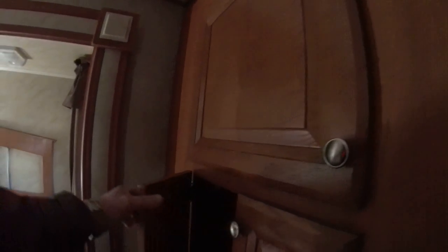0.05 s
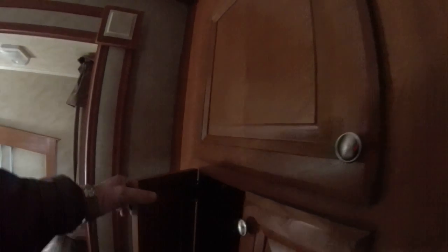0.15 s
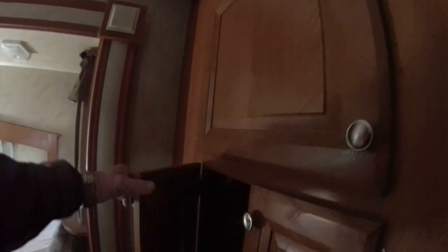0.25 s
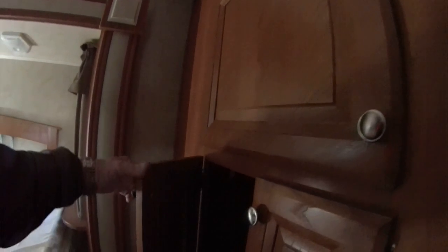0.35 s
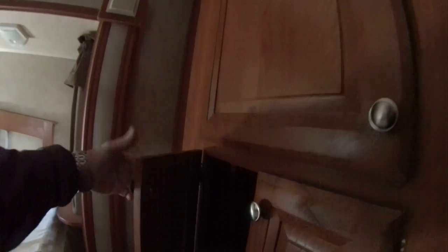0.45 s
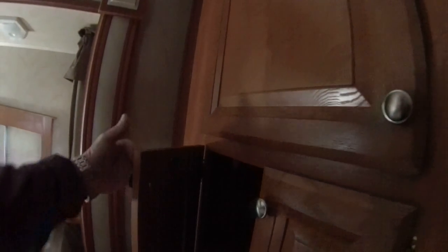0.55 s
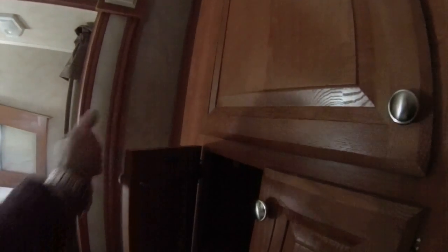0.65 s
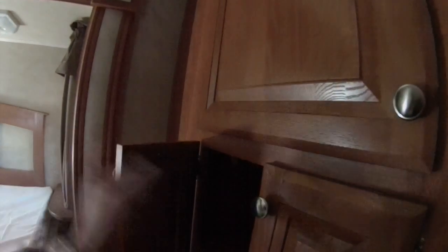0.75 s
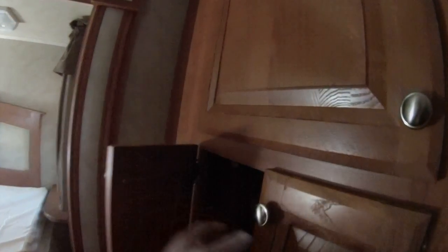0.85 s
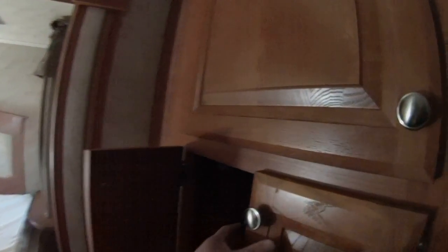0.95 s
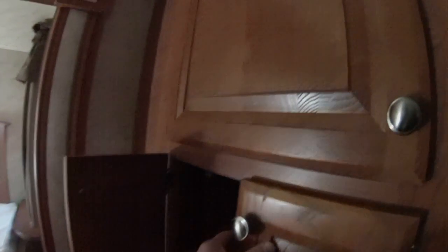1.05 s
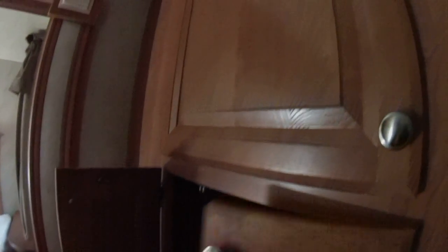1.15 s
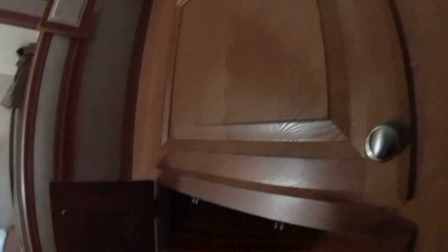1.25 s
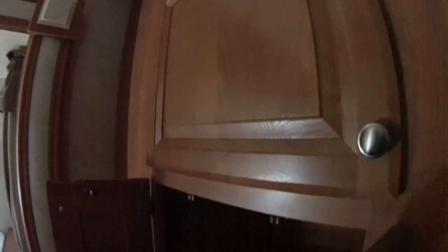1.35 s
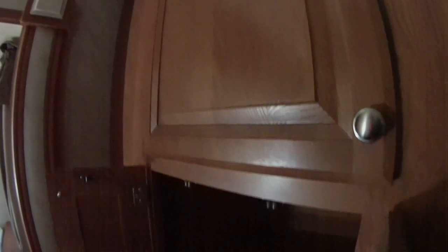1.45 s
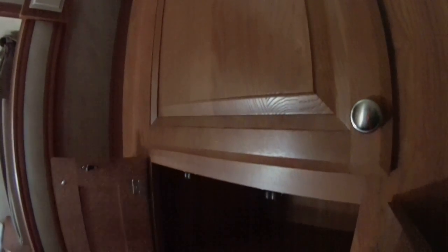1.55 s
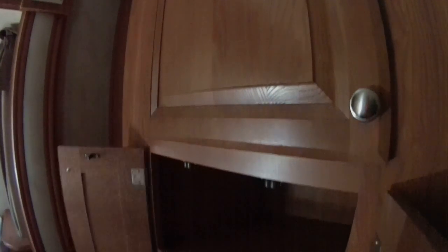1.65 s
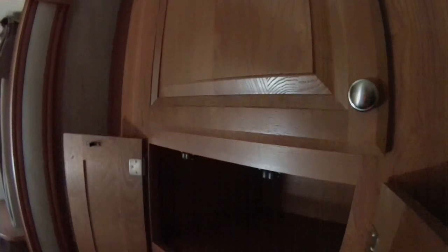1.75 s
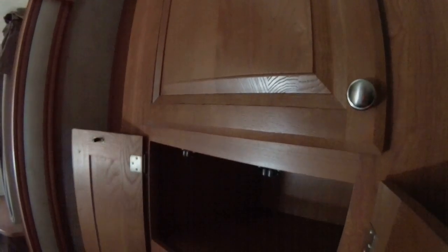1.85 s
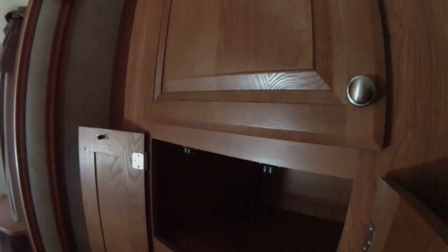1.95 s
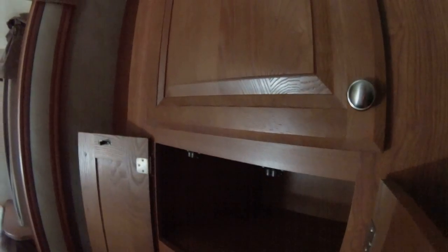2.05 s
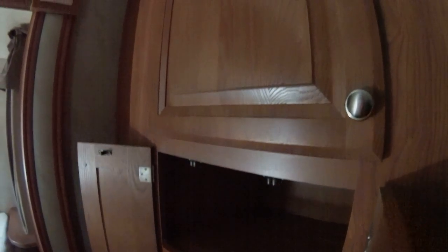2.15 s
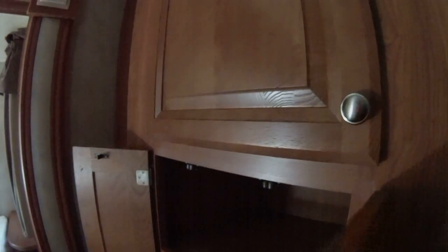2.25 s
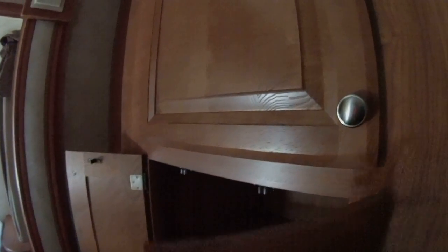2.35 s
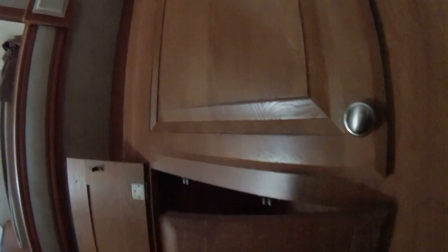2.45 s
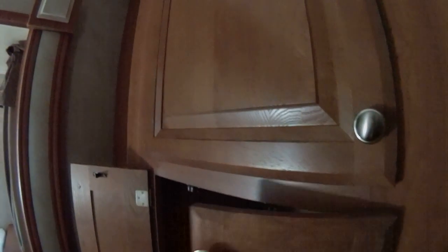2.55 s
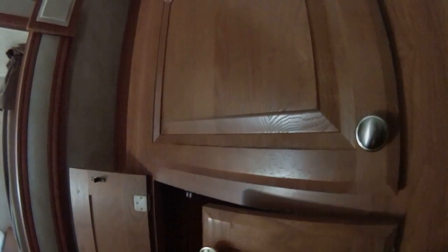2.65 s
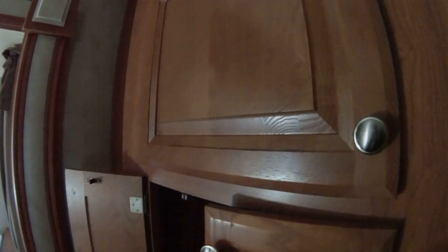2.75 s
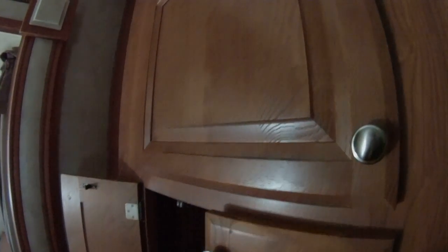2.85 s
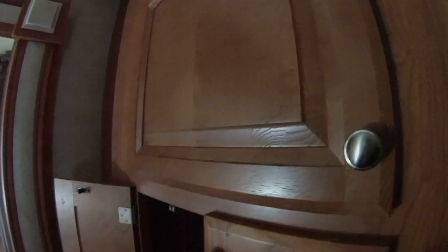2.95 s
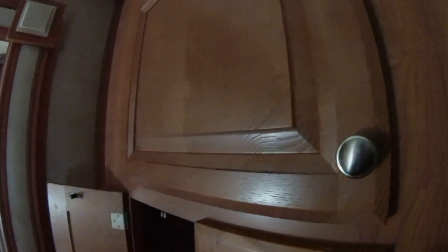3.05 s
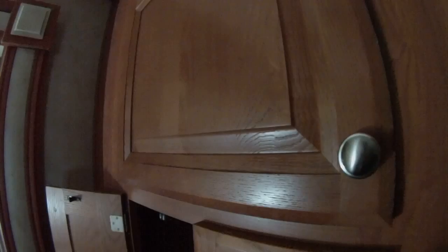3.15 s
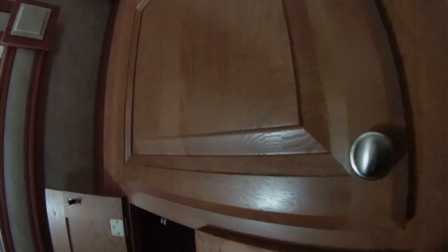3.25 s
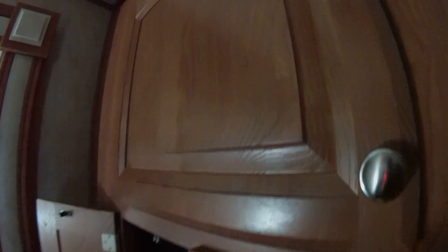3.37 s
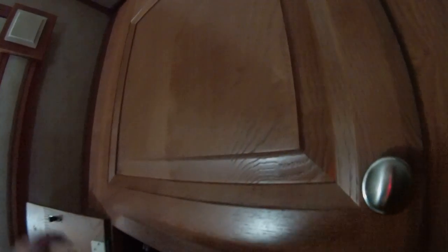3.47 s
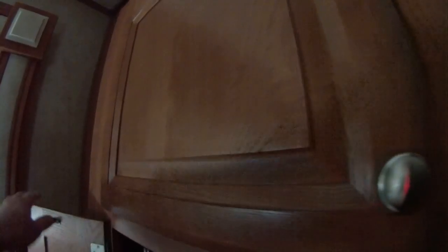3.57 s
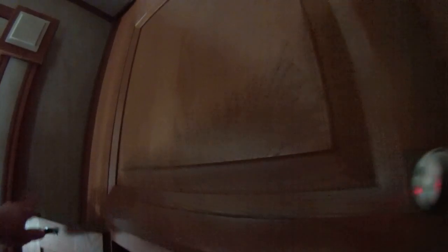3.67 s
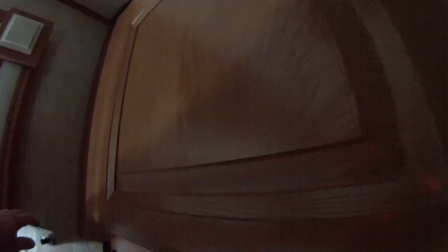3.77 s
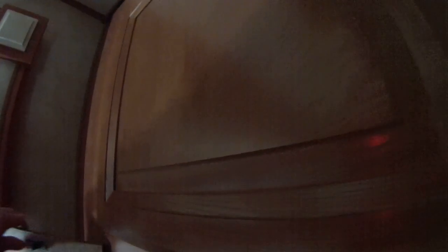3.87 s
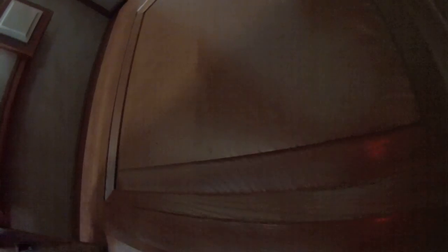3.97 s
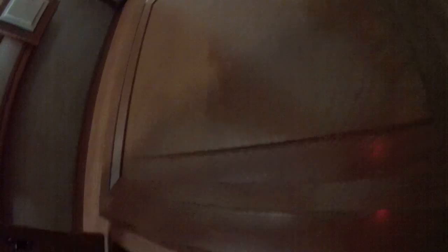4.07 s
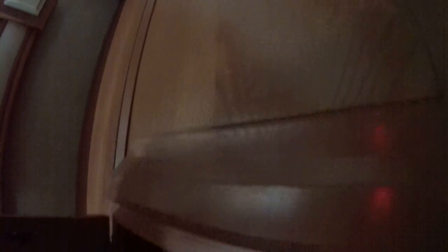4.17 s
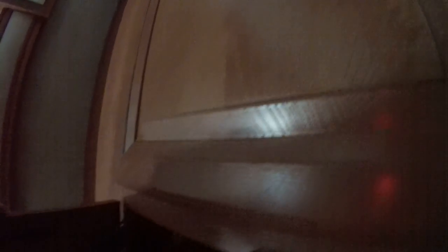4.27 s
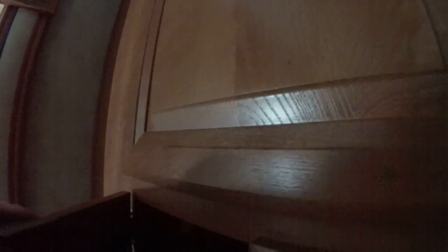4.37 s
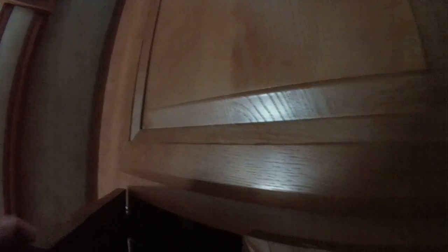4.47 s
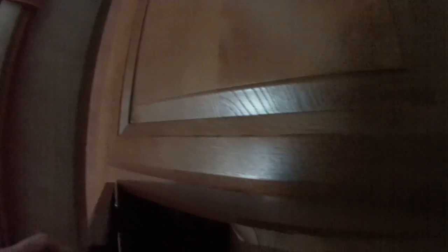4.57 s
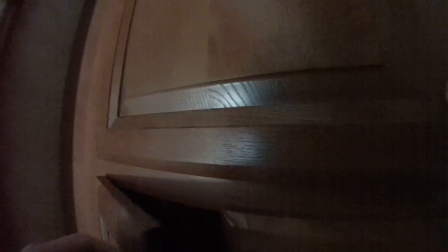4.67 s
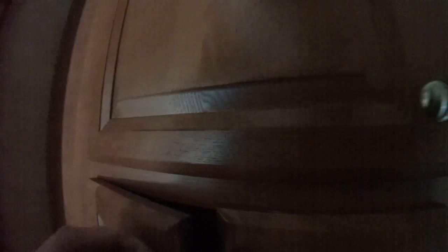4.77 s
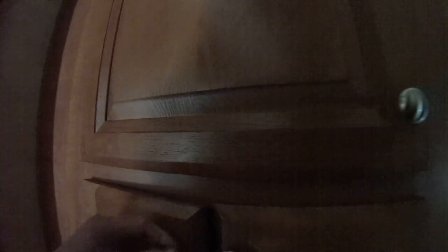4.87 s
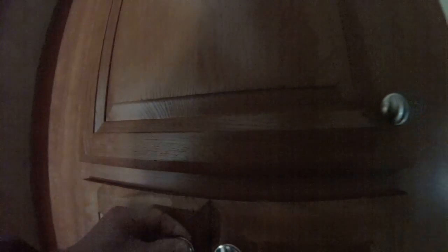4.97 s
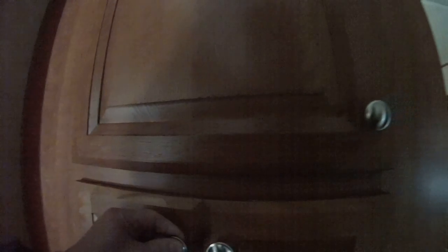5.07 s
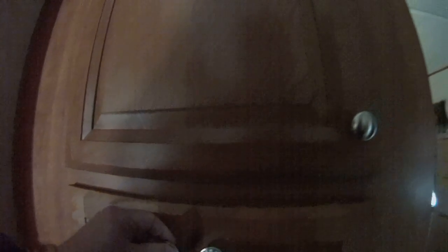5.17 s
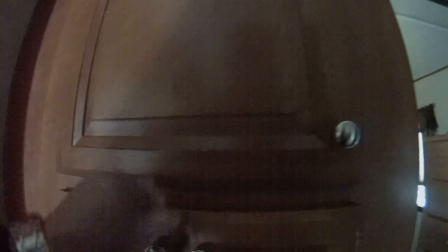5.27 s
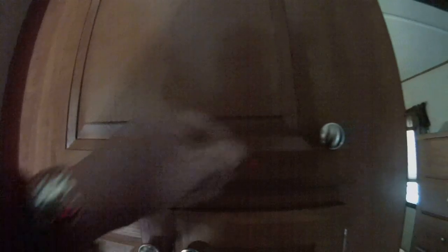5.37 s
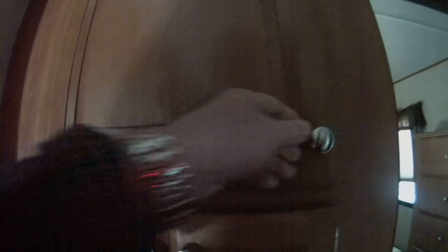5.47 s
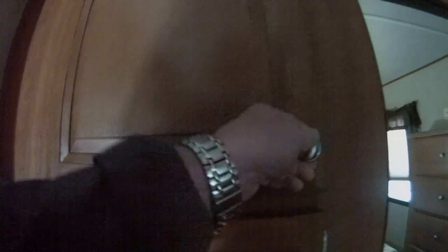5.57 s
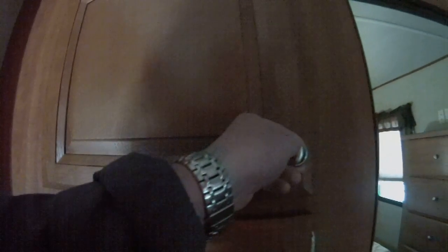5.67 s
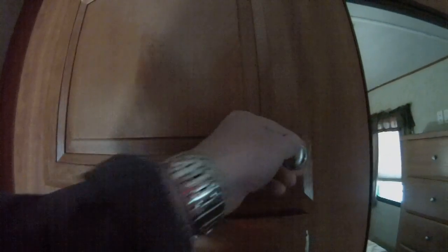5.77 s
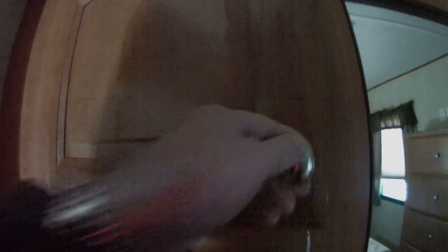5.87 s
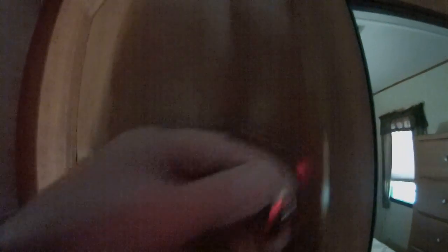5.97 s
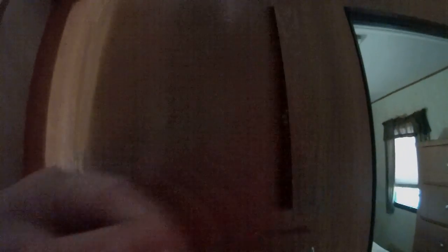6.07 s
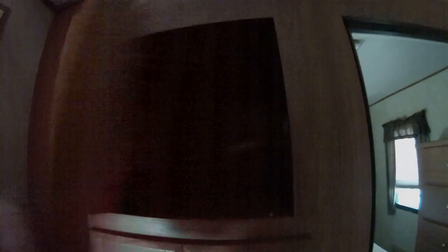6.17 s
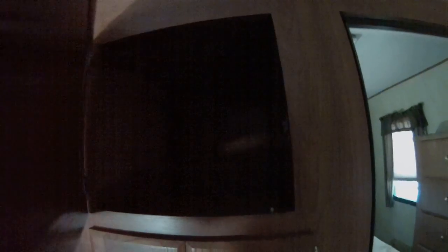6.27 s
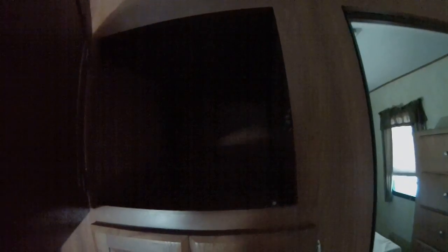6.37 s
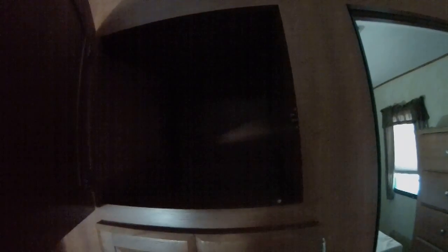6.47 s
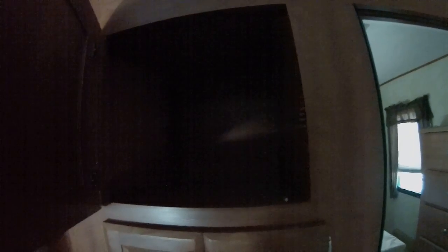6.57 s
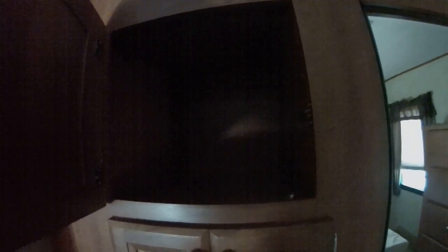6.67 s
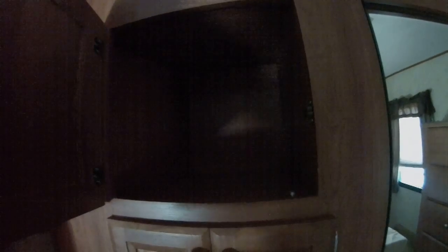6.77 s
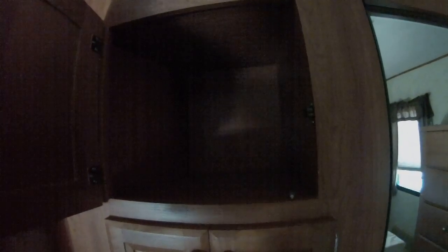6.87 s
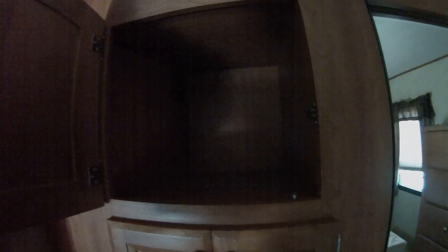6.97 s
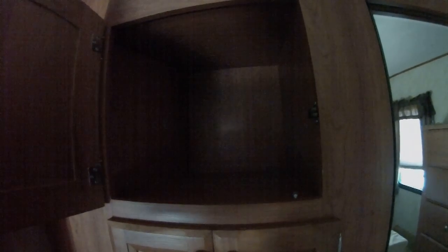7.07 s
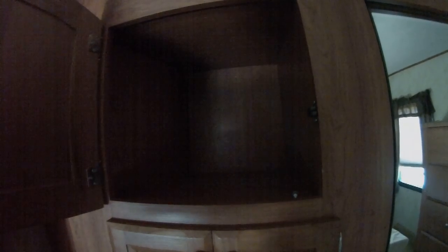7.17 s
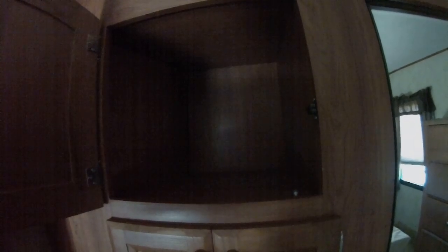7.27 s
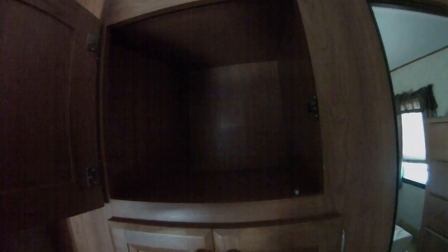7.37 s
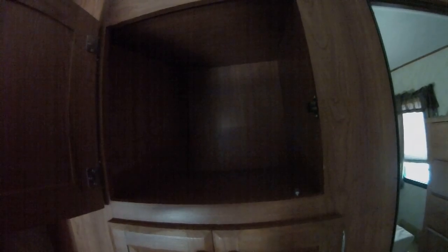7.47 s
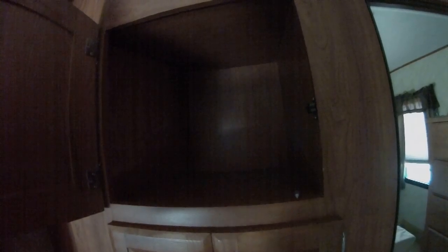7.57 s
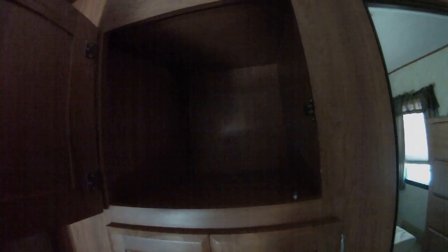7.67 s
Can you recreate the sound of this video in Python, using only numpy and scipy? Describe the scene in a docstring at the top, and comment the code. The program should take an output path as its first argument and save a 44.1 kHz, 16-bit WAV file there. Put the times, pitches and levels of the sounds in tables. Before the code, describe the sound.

Close hollow wood knocks: cabinet doors click open, bang shut twice, with dry rubbing, metal ticks, faint creaks and sleeve rustle between.

```python
"""Cabinet doors opened and shut by hand

Wooden doors are pulled open and pushed shut close to a hand-held camera in a small room.
Each blow is a noise crack, sine panel modes and a woody noise tail; metal ticks mark the sprung catches.
Grainy noise makes the rubs and hinge creaks, and short sine pairs are fingers tapping the camera.
A sleeve of coloured grains rustles over low rumble and faint air, both coloured noise.
The camera turns its gain down on loud bursts and lets it creep back."""
import sys
import numpy as np
from scipy import signal
from scipy.fft import rfft, irfft, next_fast_len
from scipy.io import wavfile
from scipy.ndimage import uniform_filter1d

SR = 44100
rng = np.random.default_rng(int(sys.argv[2]) if len(sys.argv) > 2 else 0)


def store_wav(level_fs):
    """Save 16-bit WAV to argv[1]."""
    pcm = np.round(np.clip(np.atleast_2d(level_fs), -1, 1) * 32767)
    wavfile.write(sys.argv[1], SR, pcm.T.astype(np.int16))


N = 340893
TIME = np.arange(N) / SR
BANDS_HZ = 31.25 * 2 ** (np.arange(28) / 3)  # third-octave centres
BOX_LAG_S = 0.006  # the cabinet answers this long after the door moves

# resonances of the cabinet and its panels: pitch_hz, level_db (blows only, before the drive)
PANEL_MODES = [(63, -0.5), (72, -4), (79, -14), (105, 2), (148, 0.5), (163, -12), (189, -10), (260, -11),
               (294, -1.5), (367, 4), (429, 3.5), (462, -9), (580, 2.5), (715, -7.5), (804, -9),
               (953, -4.5), (1113, 2), (1286, -9), (1420, -3), (1564, -6.5), (1860, -5), (2040, -11.5),
               (2310, -4.5), (2510, -4.5), (3350, -6.5), (3980, -6)]


def doors():
    """Doors shut and open, with light knocks and soft bumps in between."""
    # doors pushed shut: start_s, level_db, contact_cutoff_hz, struck_tone_hz, catch_ride_s,
    # edge_db, box_db, rebound_db (these three relative to level_db), rattle_delay_s
    slams = [(3.027, -24.5, 5200, 1287, .018, -5, 1, -12, .062),
             (5.0308, -25.5, 2700, 1000, 0.025, -10.5, 0, 2.5, .043)]
    # doors pulled open: start_s, level_db, thud_db, catch_ring_hz, snap_delay_s, snap_db, snap_hz,
    # rattle_delay_s
    pulls = [(1.172, -46.5, -37, 2032, .0235, -26, 7560, .0747),
             (5.8194, -43, -58, 2504, .0115, -29.5, 10630, .1094)]
    # hard light knocks of a door on its catch or stop: start_s, level_db, contact_cutoff_hz, struck_tone_hz
    knocks = [(1.103, -53.5, 6800, 2000), (2.861, -50.5, 4535, 3280), (3.000, -54, 4970, 3120),
              (3.751, -58.5, 3600, 1520), (4.926, -45, 3630, 3345), (4.935, -43.5, 3600, 600),
              (5.802, -46.5, 8000, 1280)]
    # soft bumps of a hand or a swinging door: start_s, level_db, contact_cutoff_hz, struck_tone_hz
    bumps = [(0.035, -56, 365, 130), (0.394, -56.5, 199, 140), (1.076, -50, 157, 100),
             (1.205, -46, 390, 440), (1.946, -60.5, 500, 110), (1.987, -52.5, 330, 120),
             (2.663, -53.5, 222, 224), (2.863, -38, 223, 108), (2.878, -54.5, 860, 790),
             (3.758, -45.5, 404, 102), (5.215, -48, 129, 84), (5.742, -63, 700, 430),
             (5.805, -48, 885, 580)]

    shut = sum(slam(*row) for row in slams)
    opened = sum(pull(*row) for row in pulls)
    knocking = sum(stroke(*row, tone_db=6.5, bass_db=2.5) for row in knocks)
    bumping = sum(stroke(*row, tone_db=15.5, bass_db=-1.5) for row in bumps)
    return shut + opened + knocking + bumping


def slam(start_s, level_db, contact_hz, tone_hz, ride_s, edge_db, box_db, rebound_db, rattle_s,
         ride_db=-16.5, ride_softness=0.54, latch_db=-20):
    """The door rides over the catch, lands edge first, then flat; box booms, door rebounds, catch rattles."""
    edge_s = start_s - 0.0064
    ride = stroke(start_s - ride_s, level_db + ride_db, contact_hz * ride_softness,
                  tone_hz=990, tone_db=2.5, bass_db=0)
    edge = stroke(edge_s, level_db + edge_db, contact_hz=3640, tone_hz=1600, tone_db=10.5, bass_db=1)
    flat = stroke(start_s, level_db, contact_hz, tone_hz, tone_db=7, bass_db=0.5)
    box = stroke(start_s + BOX_LAG_S, level_db + box_db, contact_hz=474, tone_hz=170, tone_db=7.5, bass_db=-1)
    rebound = stroke(start_s + 0.012, level_db + rebound_db, contact_hz=900,
                     tone_hz=370, tone_db=5.5, bass_db=-2)
    latch = tick(edge_s, level_db=-36.5, pitch_hz=10600) + tick(start_s, latch_db + edge_db, pitch_hz=5500)
    rattle = tick(start_s + rattle_s, level_db=-36, pitch_hz=6130, cycles=330, partials_db=4.5)
    return ride + edge + flat + box + rebound + latch + rattle


def pull(start_s, level_db, thud_db, ring_hz, snap_s, snap_db, snap_hz, rattle_s):
    """The door jumps out of the ringing catch and thuds; the spring snaps back and rattles once."""
    release = stroke(start_s, level_db, contact_hz=7000, tone_hz=1870, tone_db=10, bass_db=-1)
    ring = tick(start_s, level_db=-28.5, pitch_hz=ring_hz, cycles=260, partials_db=-1)
    thud = stroke(start_s + BOX_LAG_S, thud_db, contact_hz=450, tone_hz=400, tone_db=9.5, bass_db=6.5)
    snap = tick(start_s + snap_s, snap_db, snap_hz)
    rattle = tick(start_s + rattle_s, level_db=-42, pitch_hz=8200)
    return release + ring + thud + snap + rattle


def stroke(start_s, level_db, contact_hz, tone_hz, tone_db, bass_db):
    """One blow on the wood, placed in time."""
    out = np.zeros(N)
    add(out, start_s, undb(level_db) * blow(contact_hz, tone_hz, tone_db, bass_db))
    return out


def blow(contact_hz, tone_hz, tone_db, bass_db, tone_octaves=0.32, modes_db=0.9, crack_db=2,
         crack_t60=0.0042, rise_cycles=1.0, early_share=0.33, late_db=-3.5):
    """A contact excites a short crack, the panel modes and a dense woody tail."""
    # dense ring of wood and room together: pitch_hz, band_level_db, late_t60_s
    wood = [(35, -12.5, 0.43), (70, -8.5, 0.93), (144, -4.5, 0.39), (263.6, -1, 0.33), (463, -0.5, 0.26),
            (1003, 1.5, 0.18), (2640, -1.5, .17), (5000, 1.5, .17), (8000, -3, 0.18), (15000, -3.5, 0.13)]
    wood_hz, wood_db, wood_t60 = np.transpose(wood)
    t = TIME[:SR // 2]

    def drive(hz):
        """A soft contact cannot push fast; the struck spot favours one region; bass moves the whole box."""
        tone = tone_db * hump(hz, tone_hz, tone_octaves)
        bass = bass_db / (1 + (hz / 190) ** 2)
        return undb(tone + bass) / np.sqrt(1 + (hz / contact_hz) ** 4)

    def decay(hz):
        """The frame soon stops the door; box and room ring on more quietly."""
        t60 = np.interp(np.log(hz), np.log(wood_hz), wood_t60)
        return fade(t, early_share * t60) + undb(late_db) * fade(t, t60)

    hz = BANDS_HZ[:, None]
    bands = shape(rng.standard_normal(len(t)), lambda f: abs(np.log2(f / hz)) < 1 / 6)
    band_gain = drive(hz) * undb(np.interp(np.log(hz), np.log(wood_hz), wood_db))
    # a short crack straight from the contact, strongest in the treble
    crack = undb(crack_db) * hz / (hz + 900) * fade(t, crack_t60)
    tail = np.sum(bands * band_gain * (decay(hz) + crack), axis=0)

    ring = np.zeros(len(t))
    for mode_hz, mode_db in PANEL_MODES:
        # the modes start together, each slightly out of step
        phase = 0.56 * rng.standard_normal()
        sine = np.sin(2 * np.pi * mode_hz * t + phase)
        ring += drive(mode_hz) * undb(mode_db) * sine * decay(mode_hz)
    onset = 1 - np.exp(-t * contact_hz / rise_cycles)
    return (tail + undb(modes_db) * ring) * onset


def door_rubs():
    """Hand and catches rub dryly on the doors, whose panels colour the grains."""
    # middle_s, length_s, level_db, pitch_hz (before the treble tilt), width_octaves
    rub_rows = [(0.446, .15, -47.5, 250, 1.24), (0.8, 0.19, -56, 6500, 0.59), (1.14, 0.087, -39, 2000, 7.6),
                (2.64, 0.12, -48.5, 1180, 1.7), (2.66, 0.22, -44, 195, 0.31), (3.988, 0.19, -45, 660, 1.3),
                (4.256, 0.24, -44.5, 604, 2.6), (4.587, 0.14, -49.5, 620, 1.26), (4.995, 0.08, -41, 649, 1),
                (4.87, .2, -57.5, 800, 2.7), (5.55, .22, -53, 3000, 1.9)]
    return rubs(rub_rows, panel)


def hinge_creaks():
    """A swinging door creaks as stick-slip grains excite its hinge."""
    # middle_s, length_s, level_db, pitch_hz (before the treble tilt), width_octaves
    creak_rows = [(0.437, 0.14, -50.5, 2630, 1.0), (6.425, 0.2, -53.5, 960, 0.91),
                  (6.932, 0.09, -58, 2930, .33), (6.885, 0.24, -66, 5850, 0.12)]
    return rubs(creak_rows, hinge)


def rubs(rows, body):
    """Stick-slip grains ring a body and swell and die as a door swings or slides on its catch."""
    out = np.zeros(N)
    for middle_s, length_s, level_db, pitch_hz, octaves in rows:
        slips = grains(SR // 2, spread_db=4)
        scrape = shape(slips, lambda hz: body(hz) * hump(hz, pitch_hz, octaves) / hz ** 0.48)
        scrape = scrape[:int(length_s * SR)]
        swell = np.sin(np.linspace(0, np.pi, len(scrape)))
        add(out, middle_s - length_s / 2, undb(level_db) * scrape * swell)
    return out


def panel(hz, width_hz=40, between_db=-11):
    """A door radiates most at its modes, with valleys between; all peaks are equally high."""
    peaks = [1 / (1 + ((hz - mode_hz) / width_hz) ** 2) for mode_hz, _ in PANEL_MODES]
    return undb(between_db) + np.max(peaks, axis=0)


def hinge(hz, between_db=-15):
    """A hinge radiates through a few narrow resonances."""
    # pitch_hz, width_hz, level_db
    resonances = [(1210, 60, -9), (1580, 80, -6), (1930, 57, -3), (2280, 40, -6), (2640, 30, -12),
                  (3170, 46, -6), (4200, 120, -14), (5840, 270, -17)]
    peaks = sum(undb(db) / (1 + ((hz - f) / width) ** 2) for f, width, db in resonances)
    return undb(between_db) + peaks


def catches():
    """Knobs, catches and watch strap tick as they are touched."""
    # lone ticks: start_s, level_db, pitch_hz
    tick_rows = [(0.0686, -37.5, 8300), (0.67, -45.5, 6500), (0.8304, -39.5, 7050), (0.9532, -42, 9050),
                 (3.014, -32, 13100), (4.935, -41, 6640), (5.2038, -45, 6700), (5.318, -47.5, 2640),
                 (5.687, -43.5, 1906), (5.6956, -44, 3430), (5.739, -43.5, 3560), (5.803, -33.5, 6800),
                 (5.821, -27, 4060), (5.836, -32, 9300), (6.132, -49, 7130), (6.3343, -36.5, 3050),
                 (6.363, -56, 5870), (6.4017, -46, 5580)]
    return sum(tick(*row) for row in tick_rows)


def tick(start_s, level_db, pitch_hz, cycles=165, octaves=0.76, skirt_db=-22, partials_db=0.0,
         room_db=-24, room_t60=0.52):
    """A small metal part snaps and rings with a few unrelated partials; the room answers faintly."""
    out, t = np.zeros(N), TIME[:SR // 5]

    def snap_gain(hz):
        """A bell around the pitch on a wide, faint skirt."""
        return hump(hz, pitch_hz, octaves) + undb(skirt_db) * hump(hz, pitch_hz, 2.7)

    snap = shape(rng.standard_normal(len(t)), snap_gain)
    others_hz = pitch_hz * 2 ** rng.uniform(-0.39, 0.48, size=(4, 1))
    others = np.sin(2 * np.pi * others_hz * t).sum(axis=0)
    partials = unit(np.sin(2 * np.pi * pitch_hz * t) + .5 * others)
    # the part loses 60 dB in a set number of cycles, so high ticks are shorter
    direct = unit(snap + undb(partials_db) * partials) * fade(t, cycles / pitch_hz)
    answer = undb(room_db) * snap * fade(t, room_t60)
    add(out, start_s, undb(level_db) * (direct + answer))
    return out


def taps(overtone=2.35, overtone_db=-5, rise_cycles=0.24):
    """A soft fingertip gives the camera case a dead knock of two short notes."""
    # start_s, level_db, pitch_hz, t60_s
    case_taps = [(4.175, -22, 49.3, 0.088), (6.772, -35.5, 390, 0.02), (6.838, -23.5, 300, 0.011),
                 (6.894, -26.5, 334, 0.01)]
    out, t = np.zeros(N), TIME[:SR // 5]
    for start_s, level_db, pitch_hz, t60 in case_taps:
        turn = 2 * np.pi * pitch_hz * t
        notes = np.sin(turn) + undb(overtone_db) * np.sin(overtone * turn)
        onset = 1 - np.exp(-t * pitch_hz / rise_cycles)
        add(out, start_s, -undb(level_db) * notes * onset * fade(t, t60))
    return out


def sleeve(gain_db=3.0, flutter_db=1.5):
    """Cloth fibres slide over each other, on a drawn level curve that swells as the arm moves."""
    # arm movement: time_s, level_db (before gain_db and flutter)
    movement = [(0.0, -62.5), (0.56, -63), (1.18, -56.5), (2.04, -66), (2.45, -60.5), (3.36, -62.5),
                (3.79, -55), (3.94, -52.5), (4.17, -55), (4.33, -57.5), (4.52, -61), (5.4, -59),
                (5.73, -57), (6.03, -55), (6.61, -66), (6.91, -63), (7.21, -70.5), (7.73, -69.5)]
    # spectrum of the cloth: pitch_hz, relative_db_per_hz
    cloth = [(190, -35.5), (330, -1.5), (518, -4), (589, -2.5), (738, -4), (3520, -10.5), (7630, -17.5),
             (15500, -28.5)]
    time_s, level_db = np.transpose(movement)
    folds = np.interp(TIME, np.linspace(0, TIME[-1], 200), rng.standard_normal(200))
    swell_db = np.interp(TIME, time_s, level_db) + gain_db + flutter_db * folds
    return colour(grains(N, spread_db=1.5), cloth) * undb(swell_db)


def room(rumble_db=-1, air_db=-64):
    """Low rumble on a drawn curve, swelling as the cabinet shakes on after the first slam, over steady air."""
    # rumble level: time_s, level_db (before rumble_db)
    rumble_levels = [(0, -59), (2.5, -56), (3.3, -43.5), (3.7, -50.5), (4.8, -51.5), (5.7, -50.5),
                     (6.7, -62), (7.73, -60.5)]
    # spectrum of the rumble: pitch_hz, relative_db_per_hz
    rumble_colour = [(20, -4), (70, 4), (130, -8), (280, -10), (700, -36.5), (1500, -54.5)]
    # spectrum of the air: pitch_hz, relative_db_per_hz
    air_colour = [(12, -25), (20, 0.5), (70, -1.5), (129, -6.5), (12800, -41), (14300, -46), (15500, -39.5)]
    time_s, level_db = np.transpose(rumble_levels)
    swell = undb(np.interp(TIME, time_s, level_db) + rumble_db)
    rumble = colour(rng.standard_normal(N), rumble_colour) * swell
    air = undb(air_db) * colour(rng.standard_normal(N), air_colour)
    return rumble + air


def undb(db):
    """Decibels to gain."""
    return 10 ** (np.asarray(db) / 20)


def unit(x):
    """Scale to rms 1."""
    return x / np.sqrt(np.mean(x ** 2, axis=-1, keepdims=True))


def fade(t, t60):
    """A decay that loses 60 dB in t60 seconds."""
    return np.exp(-np.log(1000) * t / t60)


def hump(hz, centre_hz, octaves):
    """A bell on the log-frequency axis."""
    return np.exp(-.5 * (np.log2(hz / centre_hz) / octaves) ** 2)


def shape(x, gain):
    """Filter x by a gain that is a function of frequency; rms 1."""
    hz = np.maximum(np.fft.rfftfreq(len(x), 1 / SR), 1)
    return unit(irfft(rfft(x) * gain(hz), len(x)))


def colour(x, points):
    """Give x a spectrum drawn through points of pitch_hz and level_db."""
    f, db = np.transpose(points)
    size = next_fast_len(N, True)
    return shape(np.resize(x, size), lambda hz: undb(np.interp(np.log(hz), np.log(f), db)))[:N]


def grains(size, spread_db):
    """Dense slips of uneven strength, each under a millisecond long."""
    strength = np.repeat(rng.standard_normal(size // 32 + 1), 32)[:size]
    return rng.standard_normal(size) * undb(spread_db * strength)


def add(out, start_s, x):
    """Mix x into out from time start_s."""
    i = max(int(start_s * SR), 0)
    out[i:i + len(x)] += x[:N - i]


def gain_control(x, threshold_db=-13, ratio=2.18, recovery_db_per_s=13, window_s=.016):
    """The gain drops on a loud burst and creeps back, so the background ducks after it."""
    power = uniform_filter1d(x ** 2, int(window_s * SR) + 1)
    level_db = 10 * np.log10(abs(power) + 1e-12)
    cut_db = np.maximum(level_db - threshold_db, 0) * (1 - 1 / ratio)
    recovered_db = recovery_db_per_s * TIME
    # the deepest cut so far, less what has been recovered since
    held_db = np.maximum.accumulate(cut_db + recovered_db, axis=-1)
    return x * undb(recovered_db - held_db)


def scene():
    """Everything at one microphone."""
    handling = doors() + catches() + door_rubs() + hinge_creaks() + taps()
    return (handling + sleeve() + room())[None]


def record(dry):
    """The camera turns down on loud bursts, rounds the loudest peaks and cuts the top."""
    rounded = 1.3 * np.tanh(gain_control(dry) / 1.3)
    low_pass = signal.ellip(8, .2, 70, 15600, fs=SR, output="sos")  # ripple dB, stop dB, cut-off Hz
    return signal.sosfilt(low_pass, rounded)


dry = scene()
out = record(dry)
store_wav(out)
```